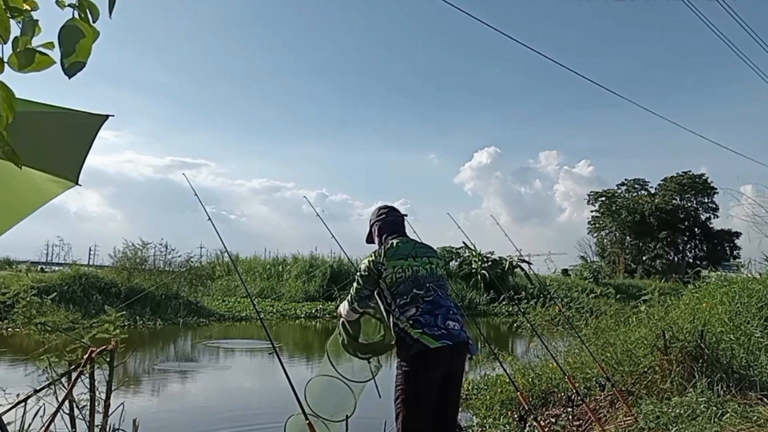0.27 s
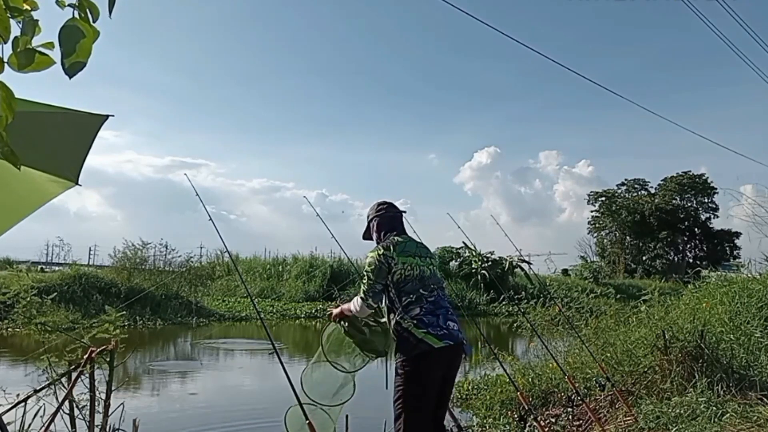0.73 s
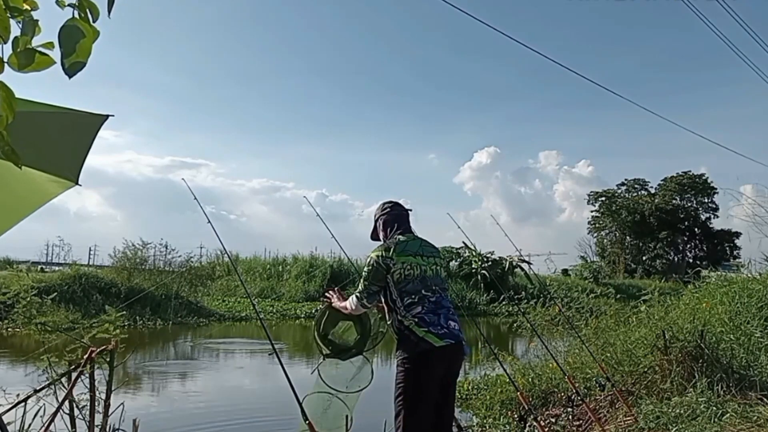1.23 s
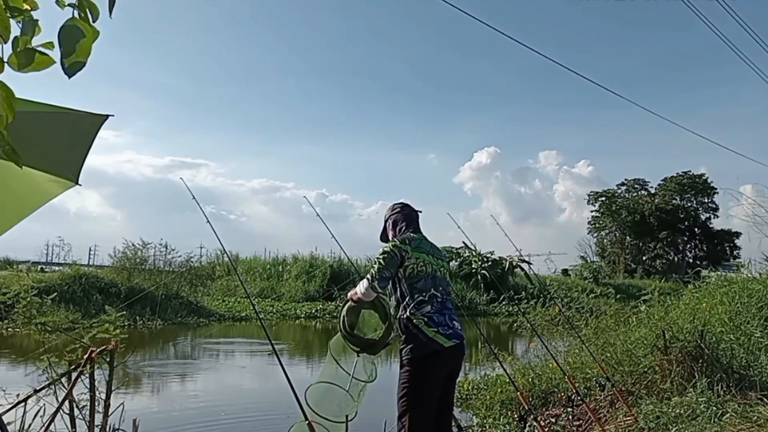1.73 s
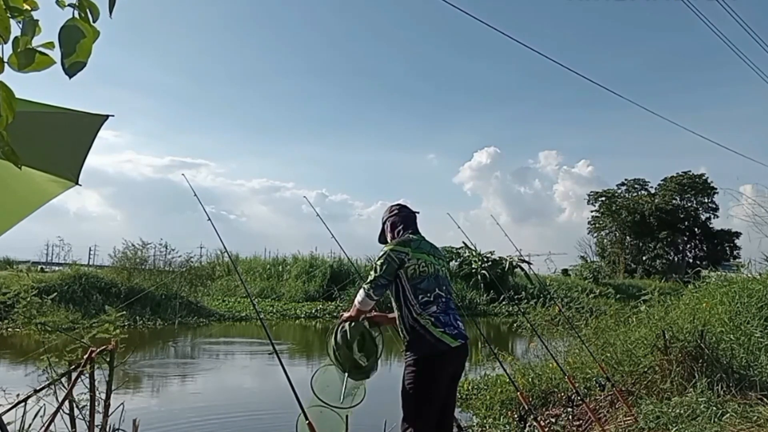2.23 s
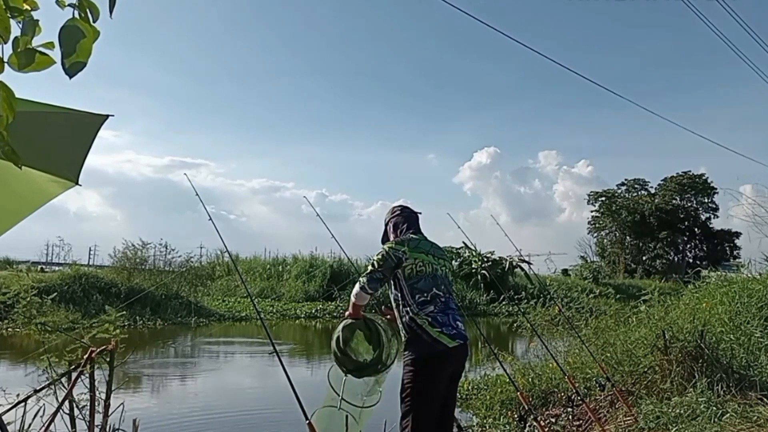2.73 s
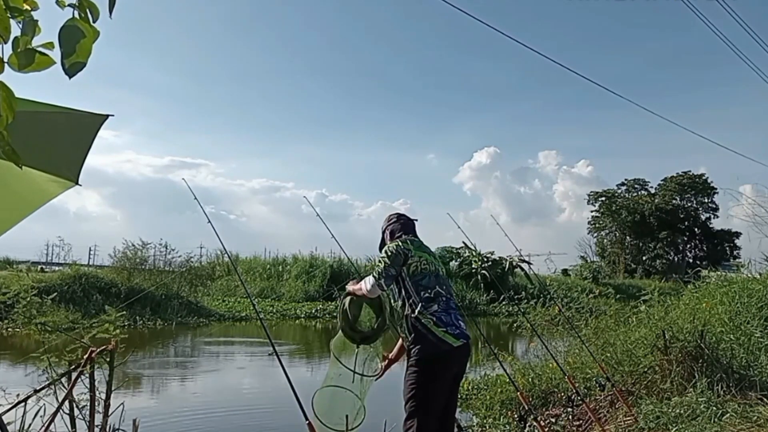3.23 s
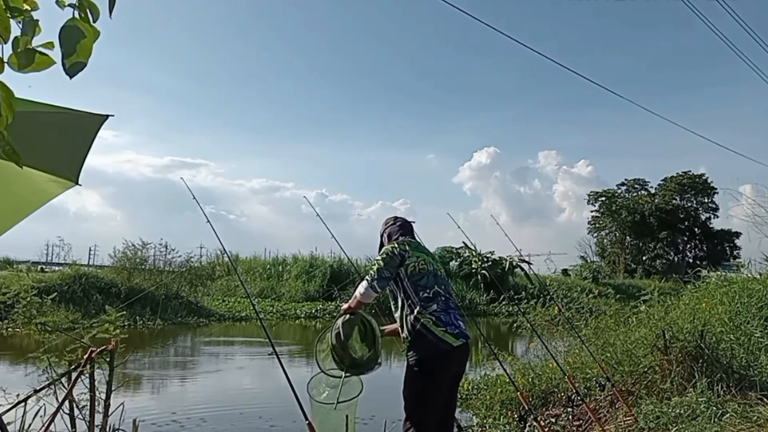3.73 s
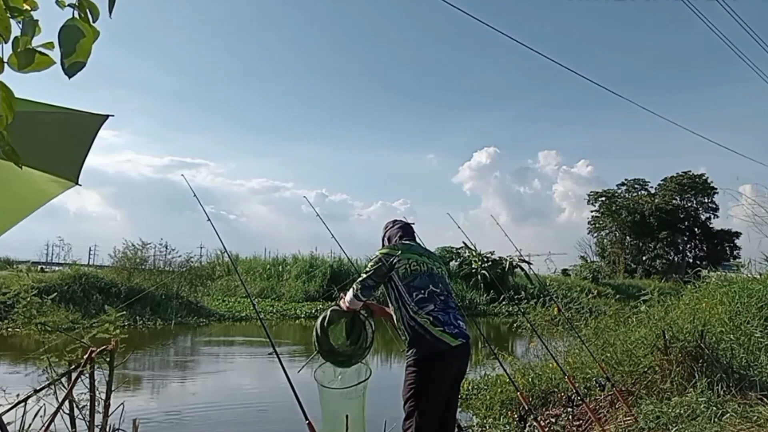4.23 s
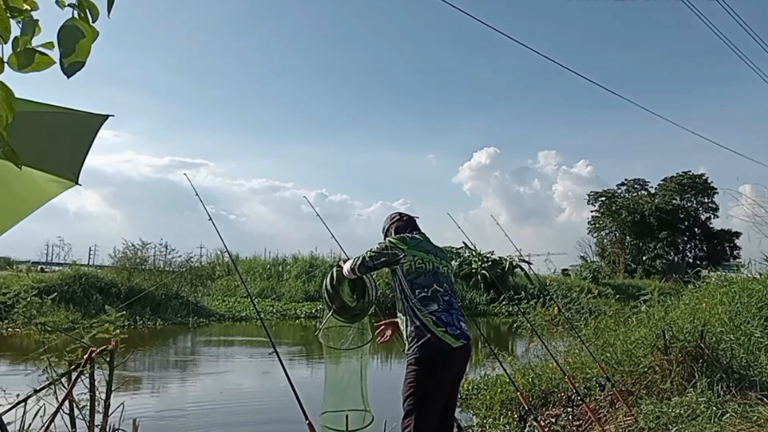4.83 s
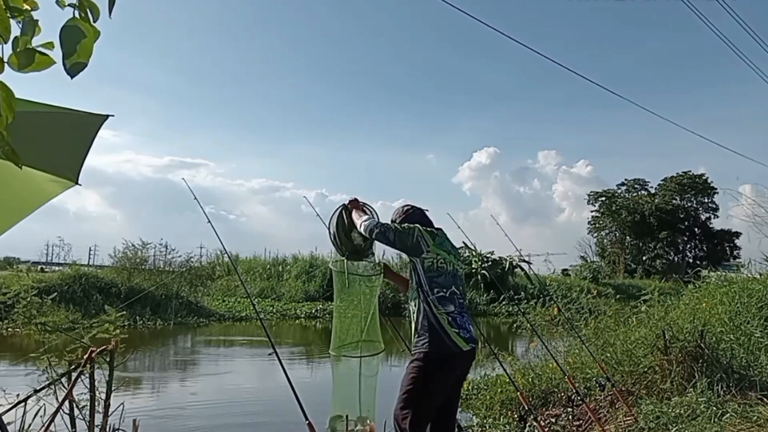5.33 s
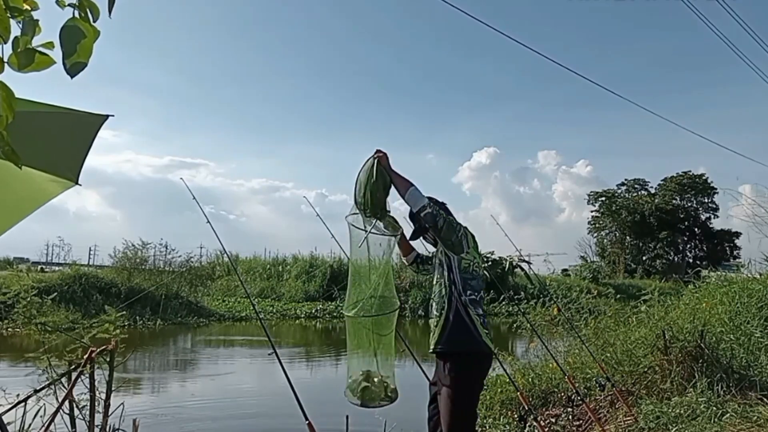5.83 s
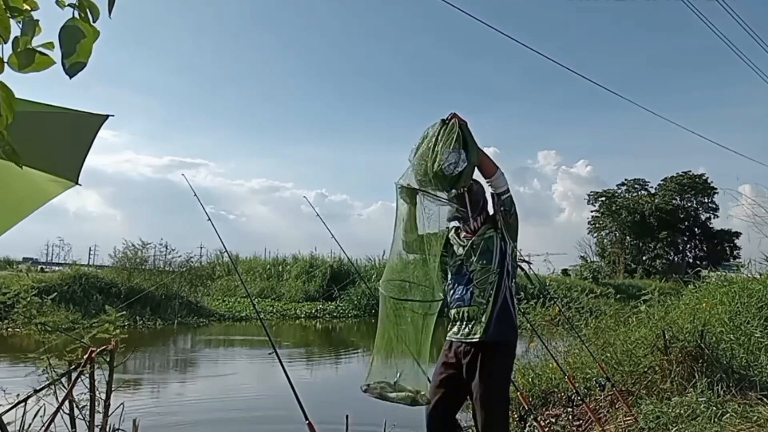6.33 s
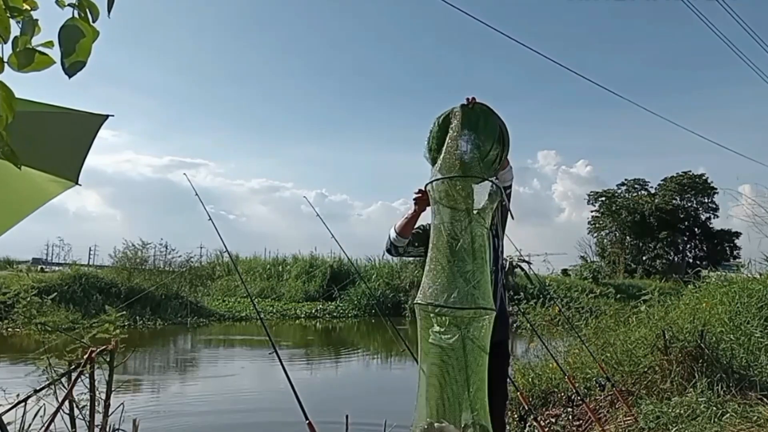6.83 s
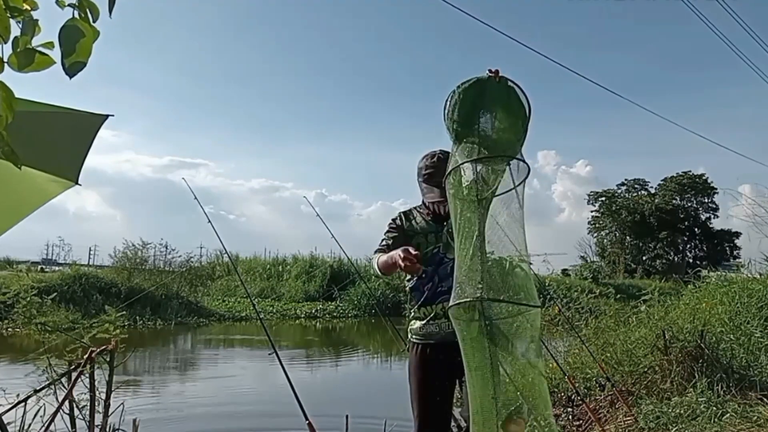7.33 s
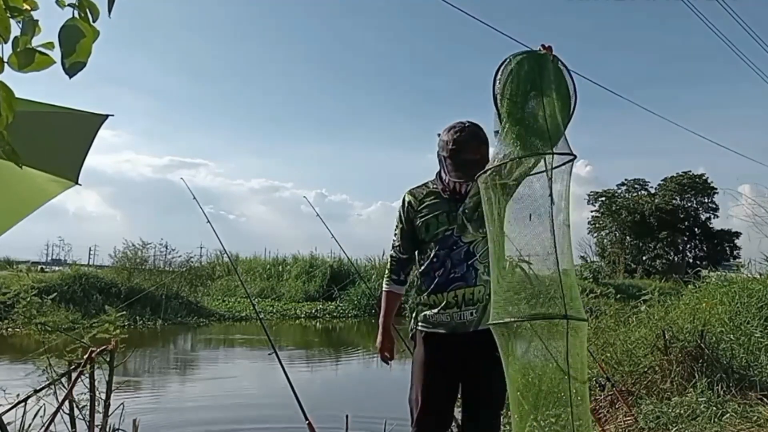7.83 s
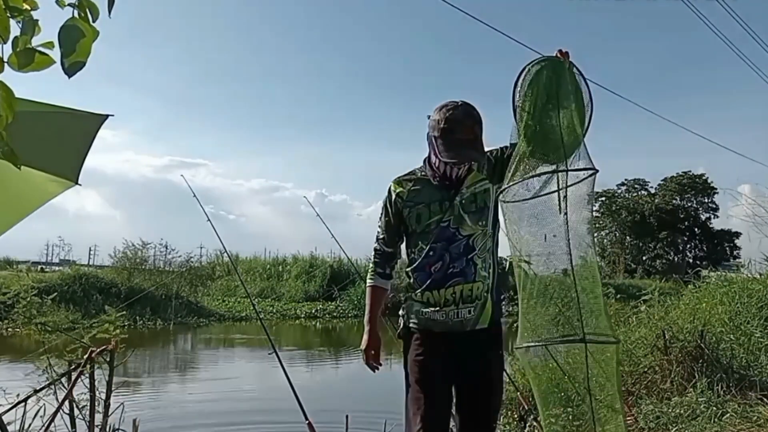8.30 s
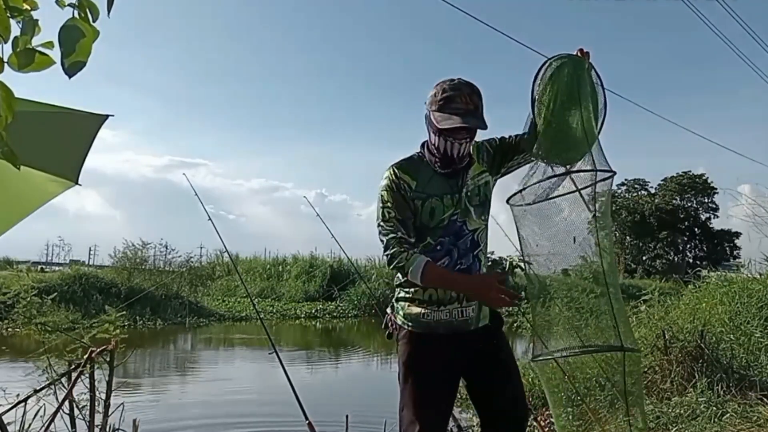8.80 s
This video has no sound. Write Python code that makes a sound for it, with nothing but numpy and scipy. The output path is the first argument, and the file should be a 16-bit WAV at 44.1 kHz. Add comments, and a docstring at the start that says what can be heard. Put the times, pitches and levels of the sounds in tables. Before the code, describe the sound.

A wet mesh net is hauled out of a canal in several pulls, each shedding a splashy, gurgling rush of water. Its hoops knock sharply during the fullest pour. Once the net is clear, the water thins to drips, spatters and small wet slaps, with a couple more light knocks. Small birds chirp and warble farther off, over a low rumble of distant traffic and open-air hiss.

```python
"""Canal bank: a wet mesh keepnet is hauled out of the water.
Each pull sheds a rush that sprays (noisy drop impacts) and gurgles (ringing bubbles); the mesh slaps
and drips, the hoops knock lightly. Small birds whistle in the bushes, with one thin, faint, very high
ping, over the low rumble of distant traffic and open-air hiss."""
import sys
import numpy as np
from scipy import signal
from scipy.fft import rfft, irfft
from scipy.io import wavfile
from scipy.ndimage import uniform_filter1d

SR = 44100
rng = np.random.default_rng(int(sys.argv[2]) if len(sys.argv) > 2 else 0)


def to_wav(sig):
    """Store sig (one row per channel, or 1-D mono) as 16-bit WAV at the path in sys.argv[1].

    Samples outside -1..1 are clipped; the rate is SR.
    """
    pcm = np.clip(np.atleast_2d(sig), -1, 1) * 32767
    pcm = np.round(pcm).astype(np.int16)
    wavfile.write(sys.argv[1], SR, pcm.T)  # frames by channels


N = 399546

# Table levels are relative, ahead of each layer's gain.
# water shed per pull (start [s], length [s], spray level [dB], churn level [dB])
PULLS = [(0.353, 0.25, -90, -59), (0.7, 0.24, -55, -50), (1.239, 0.2, -66, -49.5),
         (1.456, 0.3, -60.5, -50.5), (1.987, 0.029, -58.5, -70), (2.208, 0.087, -56, -44.5),
         (2.27, 0.13, -52, -39.5), (2.413, 0.098, -51.5, -54), (2.507, 0.24, -54, -46),
         (2.753, 0.43, -53.5, -44.5), (3.96, 0.11, -53, -69), (4.282, 0.024, -55.5, -60),
         (4.69, 0.014, -49, -47.5), (5.584, 0.24, -66, -66), (6.73, 0.041, -59, -59.5),
         (6.959, 0.047, -55.5, -57), (7.087, 0.17, -65, -58), (7.446, 0.098, -62.5, -60),
         (8.468, 0.045, -61.5, -71), (8.792, 0.059, -54, -56)]
# wet mesh slaps (time [s], level [dB], t60 [s], body weight [dB])
MESH_SPLASHES = [(0.2376, -48, 0.12, -28), (0.345, -67.5, 0.18, 18), (0.421, -62, 0.1, 15.5),
                 (0.484, -63.5, 0.13, 15.5), (0.679, -62, 0.19, 14), (0.7336, -46, 0.15, 4),
                 (0.833, -42, 0.033, -24), (1.2356, -41.5, 0.13, 2.5), (1.279, -42, 0.45, -4),
                 (1.485, -42, 0.28, -10), (1.605, -45.5, 0.19, -15), (2.5314, -25, 0.042, -26),
                 (2.896, -39, 0.12, 0.5), (2.949, -40.5, 0.2, -11), (3.6755, -48, 0.071, -12),
                 (4.5435, -50, 0.26, -6.5), (4.7311, -28.5, 0.068, -29), (5.111, -39.5, 0.025, -13),
                 (5.615, -44, 0.081, -8), (5.652, -40, 0.17, -11), (5.733, -34, 0.043, -33),
                 (6.58, -56.5, 0.093, 8), (6.7, -60.5, 0.056, 14), (6.909, -48.5, 0.22, -31),
                 (6.992, -36, 0.082, -11), (7.1063, -36.5, 0.093, -33), (7.141, -45, 0.31, -2.5),
                 (7.3152, -42, 0.18, -19), (7.432, -61, 0.11, 16.5), (7.911, -48.5, 0.038, 1),
                 (8.051, -58, 0.23, 3.5), (8.2219, -46, 0.061, -9), (8.3612, -35.5, 0.061, -35),
                 (8.509, -50, 0.24, -1.5), (8.607, -52, 0.061, 8), (8.8, -42, 0.046, 0),
                 (8.8265, -25.5, 0.07, -31), (8.8525, -30.5, 0.14, -29)]
# run-off between rushes (time [s], level [dB])
RUNOFF = [(0, -67.5), (.6, -64.5), (1.2, -60), (1.9, -71), (3.4, -72), (4.2, -71), (5.2, -66), (5.5, -75),
          (5.8, -67.5), (6.25, -82), (7.3, -71.5), (8.1, -73.5), (9.05, -74)]
# single drops on mesh and grass (time [s], level [dB])
DROP_TICKS = [(4.04, -43), (4.1958, -46), (5.6989, -47), (5.8222, -45), (5.8853, -47), (6.765, -40.5),
              (6.8907, -47), (6.9144, -44.5), (7.677, -59), (7.787, -52), (7.8336, -57), (7.9742, -40.5),
              (7.9848, -46), (8.199, -48), (8.4033, -58), (8.732, -45.5)]
# drop impact spectrum (frequency [Hz], level [dB])
SPRAY_SPECTRUM = [(600, -11), (1100, -9.5), (1750, -9), (2300, -13), (3600, -0.5), (4700, -6.5),
                  (5400, -13), (7200, -13), (8700, -5.5), (10300, -15.5), (12300, -20), (15600, -19)]
# favoured bubble sizes (centre [Hz], half-width [Hz], level [dB])
BUBBLE_BANDS = [(507.6, 83, -6.5), (860.6, 211, -6.5), (1314, 230, -10)]
# large bubbles (time [s], level [dB], nominal pitch [Hz])
LARGE_BUBBLES = [(0.392, -45, 800), (0.424, -41, 1410), (0.73, -39.5, 840), (0.819, -34, 570),
                 (0.872, -36, 460), (1.033, -42, 522), (1.28, -34, 1290), (1.312, -32, 521),
                 (1.336, -30, 1034), (1.361, -34.5, 900), (1.409, -32.5, 810), (1.486, -35, 520),
                 (1.56, -33, 870), (1.498, -35, 760), (1.655, -43, 485), (1.724, -36.5, 495),
                 (2.238, -36.5, 780), (2.335, -32.5, 492), (2.362, -39, 294), (2.388, -36, 452),
                 (2.581, -31, 492), (2.662, -38.5, 167), (2.778, -38.5, 497), (2.813, -35.5, 593),
                 (2.896, -39, 474), (2.955, -37, 507), (2.991, -29.5, 522), (3.14, -37, 610),
                 (4.03, -48, 506), (4.31, -47.5, 530), (4.544, -45, 500), (6.648, -46, 630),
                 (5.302, -45.5, 1590), (6.976, -44, 1160), (7.483, -40.5, 1360), (8.826, -32, 1420),
                 (8.945, -42.5, 1240)]
# hoop knocks (time [s], level [dB], ring [Hz])
HOOP_KNOCKS = [(2.532, -7.5, 3520), (2.581, -13.5, 4340), (2.7114, -21.5, 3670), (6.647, -23, 3740),
               (8.3595, -19.5, 2270)]
# single bird notes, plus one thin, faint, very high ping
# (time [s], length [s], first [Hz], middle [Hz], last [Hz], level [dB])
NOTES_AND_PING = [(0.005, 0.19, 1180, 1104, 990, -74.5), (0.123, 0.029, 3510, 3580, 3570, -58.5),
                  (0.325, 0.1, 3650, 3950, 4590, -59.5), (0.564, 0.089, 3420, 3870, 3810, -60),
                  (1.1, 0.076, 2660, 2620, 2500, -64), (1.855, 0.16, 1150, 1112, 970, -69.5),
                  (3.657, 0.18, 3420, 4410, 4430, -64), (4.362, 0.035, 3840, 3730, 3500, -56.5),
                  (4.468, 0.092, 2630, 2654, 2590, -61.5), (4.603, 0.13, 3650, 3380, 3360, -62.5),
                  (4.791, 0.13, 3150, 2860, 2650, -63), (4.923, 0.065, 3050, 3450, 3680, -61),
                  (5.086, 0.055, 3280, 3045, 2550, -57.5), (5.18, 0.096, 2700, 2646, 2810, -58),
                  (5.286, 0.11, 3730, 3750, 3630, -62.5), (6.065, 0.12, 4300, 4390, 4380, -67.5),
                  (6.48, 0.085, 5500, 5240, 5130, -73), (8.257, 0.029, 11950, 11950, 11900, -77),
                  (8.33, 0.09, 2200, 3500, 1880, -65.5)]
# warbler phrase (offset [s], length [s], first [Hz], middle [Hz], last [Hz], level [dB])
WARBLE = [(0, 0.046, 4700, 4930, 5860, -60.5), (0.136, 0.018, 5340, 4560, 3920, -56),
          (0.195, 0.024, 4280, 4380, 4570, -57), (0.221, 0.0236, 4090, 4050, 3400, -52.5),
          (0.27, 0.021, 4620, 4670, 4300, -54.5), (0.298, 0.019, 4220, 3880, 3520, -51.5),
          (0.335, 0.039, 3220, 4185, 4270, -47.5), (0.436, 0.06, 4400, 4670, 5320, -63.5),
          (0.51, 0.017, 5050, 4520, 3900, -50.5), (0.555, 0.028, 4270, 3860, 3300, -52),
          (0.616, 0.037, 4550, 4400, 3500, -49.5), (0.678, 0.029, 4180, 3660, 2770, -54.5),
          (0.71, 0.069, 3500, 3550, 2380, -58)]
# phrase entries (time [s], gain [dB])
WARBLE_STARTS = [(3.873, -4.5), (7.536, -3)]
# another bird's short pips (time [s], pitch [Hz], level [dB])
BIRD_PIPS = [(4.902, 2870, -53.5), (4.938, 2940, -54.5), (4.973, 2840, -56), (5.11, 2833, -55),
             (5.151, 2900, -54), (5.358, 2970, -56), (5.399, 2927, -53.5), (5.437, 2766, -54),
             (5.564, 2870, -53), (5.608, 2844, -52)]
# nearer bird's repeated falling note (time [s], held [Hz], last [Hz], level [dB])
NEAR_TRILL = [(5.778, 4010, 3570, -57.5), (5.917, 4000, 3520, -55.5), (6.035, 3950, 3430, -55),
              (6.159, 3940, 3020, -55), (6.286, 3950, 3130, -52), (6.411, 4100, 3550, -54.5),
              (6.54, 3970, 3250, -56), (6.676, 3860, 2890, -57)]
# traffic rumble and hiss (frequency [Hz], level [dB])
AIR_SPECTRUM = [(30, -24), (42, -12.5), (54, 2.5), (105, 1), (160, -8), (220, -13), (420, -24.5),
                (1100, -29), (1800, -34.5), (3900, -35), (5300, -49), (7200, -46.5), (8600, -41),
                (11500, -73), (15600, -49)]

LIFTED_S = 3.9  # net clear of the water, dripping
NEAR_S, NEAR_TREBLE_DB = 5.8, 2  # net held close: brighter drops
RISE_S, SAG_DB, SPRAY_DRAIN_DB_PER_S, CHURN_DRAIN_DB_PER_S = 0.023, -3, 133, 229
AIR_DB, CUTOFF_HZ = -49, 15650


def spray():
    """Fine drops land in clumps, many ringing; splashes crack, then crackle; single drops tick."""
    t = np.arange(N) / SR
    fine = patter(per_s=600, spread_db=-1, ring_s=.0045) + .61 * rng.standard_normal(N)
    crackle = patter(per_s=450, spread_db=3.5, ring_s=.0022) + .65 * rng.standard_normal(N)
    splash_env, body_env, crack_env, tick_env = impact_envelopes()
    trickle = gain_of(np.interp(t, *np.transpose(RUNOFF)) + 2.5 * drift(per_s=18) - 2.5)  # spurts
    flow = np.hypot(trickle, rushes(column=2, drain_db_per_s=SPRAY_DRAIN_DB_PER_S))
    flow *= gain_of(5 + 2.05 * drift(per_s=41))
    slap = unit_rms(band(patter(per_s=900, spread_db=6.5, ring_s=.0078), 810, 2830))
    stray = coloured(patter(per_s=40, spread_db=3.5, ring_s=.0016), SPRAY_SPECTRUM[4:])
    crack = coloured(rng.standard_normal(N), SPRAY_SPECTRUM)
    ringing = sum(bubble_train(bubble(hz, cycles=8, rise=.07), per_s=60, spread_db=2.5)
                  for hz in np.geomspace(1900, 5500, 8))
    out = gain_of(-2) * coloured(fine, SPRAY_SPECTRUM) * flow
    out += gain_of(-4) * coloured(crackle, SPRAY_SPECTRUM) * splash_env
    out += gain_of(-8.5) * unit_rms(ringing) * np.hypot(flow, .5 * splash_env)
    out += crack * crack_env + unit_rms(band(crack, 3500, 22000)) * tick_env
    out += gain_of(-71) * stray * (t > LIFTED_S)
    treble = band(out, 5000, 20000) * (t > NEAR_S)
    return out + (gain_of(NEAR_TREBLE_DB) - 1) * treble + slap * body_env


def impact_envelopes():
    """Exponential decays: splash, its lower body, its opening crack, drop tick."""
    splash, body, crack, tick = np.zeros((4, N))
    t = np.arange(SR // 4) / SR
    for s, db, t60_s, body_db in MESH_SPLASHES:
        burst = gain_of(db - 60 * t / t60_s) * (1 - np.exp(-t / .0015))
        add(splash, s, burst)
        add(body, s, burst * gain_of(body_db))
        add(crack, s, burst * .5 * np.exp(-t / .0082))
    for s, db in DROP_TICKS:
        add(tick, s, gain_of(db - 4.5) * np.exp(-t / .0045))
    return splash, body, crack, tick


def rushes(column, drain_db_per_s):
    """Power-summed envelope of the rushes: each swells, sags, drains away."""
    power, t = np.zeros(N), np.arange(SR) / SR
    for row in PULLS:
        s, length_s, db = row[0], row[1], row[column]
        shape_db = SAG_DB * np.minimum(t / length_s, 1) - drain_db_per_s * np.maximum(t - length_s, 0)
        add(power, s, (np.minimum(t / RISE_S, 1) * gain_of(db + shape_db)) ** 2)
    return np.sqrt(power)


def drops(per_s, spread_db):
    """Random impact train, uneven in size."""
    size = gain_of(spread_db * np.minimum(rng.exponential(1, N), 4)) * rng.choice([-1., 1.], N)
    return size * (rng.random(N) < per_s / SR)


def patter(per_s, spread_db, ring_s):
    """Noise flaring with each small impact."""
    flares = signal.lfilter([1], [1, -np.exp(-1 / (ring_s * SR))], abs(drops(per_s, spread_db)))
    return unit_rms(flares * rng.standard_normal(N))


def gurgle():
    """Bubble swarm surging with each rush, drips once lifted, single large bubbles."""
    swarm, drips = np.zeros((2, N))
    for hz, half_width_hz, db in BUBBLE_BANDS:
        for offset, z in zip(np.linspace(-1, 1, 8), rng.standard_normal(8)):
            ring = bubble(hz + half_width_hz * offset, cycles=5 * np.exp(.25 * z), rise=.05)
            swarm += gain_of(db) * bubble_train(ring, per_s=36, spread_db=2.8)
    for hz in np.geomspace(950, 2700, 8):
        drips += bubble_train(bubble(hz, cycles=2.5, rise=.08), per_s=5, spread_db=2.5)
    wash = band(rng.standard_normal(N), 145, 2300)
    surges = rushes(column=3, drain_db_per_s=CHURN_DRAIN_DB_PER_S) * gain_of(-1 + 2 * drift(per_s=48))
    out = surges * unit_rms(unit_rms(swarm) + .34 * unit_rms(wash))
    out += gain_of(-72.5) * unit_rms(drips) * (np.arange(N) > LIFTED_S * SR)
    for s, db, hz in LARGE_BUBBLES:
        decay_jitter, rise_jitter = rng.uniform(-1.2, 1, 2)
        ring = bubble(.992 * hz, cycles=5.13 * np.exp(.17 * decay_jitter), rise=.01 * (1 + rise_jitter))
        add(out, s, gain_of(db + 5.5) * ring)
    return out


def bubble(hz, cycles, rise):
    """Damped sine; pitch climbs as the bubble nears the surface."""
    u = np.arange(int(4 * cycles * SR / hz)) / SR * hz / cycles
    return (1 - np.exp(-9 * u)) ** 2 * np.exp(-1.6 * u) * np.sin(2 * np.pi * cycles * (u + rise * u ** 2))


def bubble_train(ring, per_s, spread_db):
    """One bubble ring per random impact."""
    return signal.oaconvolve(drops(per_s, spread_db), ring)[:N]


def hoop_knocks():
    """Brief ring, its reflection off the water, a scattered tail."""
    out, t = np.zeros(N), np.arange(SR // 8) / SR
    for s, db, hz in HOOP_KNOCKS:
        ring = (1 - np.exp(-t / .00031)) * np.exp(-t / .00039) * np.sin(2 * np.pi * hz * t)
        ring = band(ring, .65 * hz, 2 * hz)  # thin hoop: no low body
        tail = unit_rms(band(rng.standard_normal(len(t)), .63 * hz, 1.29 * hz)) * np.exp(-t / .0082)
        add(out, s + .000693, gain_of(db + 3.5) * ring)
        add(out, s + .0029, gain_of(db - 3.5) * ring)
        add(out, s, gain_of(db - 20) * tail)
    return out


def birds_and_ping():
    """Single bird notes, a warbler's phrase sung twice, pips, a nearer trill; one faint high ping."""
    out = np.zeros(N)
    for s, *row in NOTES_AND_PING:
        add(out, s, note(*row))
    for start_s, gain_db in WARBLE_STARTS:
        for offset_s, *glide, db in WARBLE:
            add(out, start_s + offset_s, note(*glide, db + gain_db))
    for s, hz, db in BIRD_PIPS:
        add(out, s, note(.0202, .94 * hz, hz, .99 * hz, db))
    for s, held_hz, last_hz, db in NEAR_TRILL:  # hold, downward hook, opening tick
        add(out, s, note(.036, held_hz, .98 * held_hz, .95 * held_hz, db - 4, [-12, -27]))
        add(out, s + .022, note(.026, held_hz, .5 * (3600 + last_hz), last_hz, db - 2.5, [-23]))
        add(out, s - .004, note(.0067, 5600, 4470, held_hz, db - 8))
    return out


def note(length_s, first_hz, middle_hz, last_hz, db, overtones_db=()):
    """Gliding tone; trembles in pitch and level, swells towards its end."""
    u = np.arange(int(length_s * SR)) / (length_s * SR)
    pitch_shake, level_shake = uniform_filter1d(rng.standard_normal((2, SR // 4)), 130)[:, :len(u)]
    glide_hz = np.interp(u, [0, .5, 1], [first_hz, middle_hz, last_hz])
    glide_hz = uniform_filter1d(glide_hz, len(u) // 5 + 1, mode="nearest")
    turns = np.cumsum(glide_hz + 650 * pitch_shake) / SR
    tone = sum(gain_of(d) * np.sin(2 * np.pi * k * turns) for k, d in enumerate([0, *overtones_db], 1))
    envelope = gain_of(db + 33.6 * level_shake + 6.4 * u) * signal.windows.tukey(len(u), .45)
    return np.sqrt(2) * envelope * tone


def traffic_and_air():
    """Distant rumble and hiss; a faint engine drone wavers inside."""
    noise = coloured(rng.standard_normal(N), AIR_SPECTRUM) * gain_of(.8 * drift(per_s=3))
    flutter = (gain_of(1.5 * drift(per_s=11)) - 1) * band(noise, 48, 390)
    drone_hz = 107 + 7 * drift(per_s=9.07)
    drone = np.sin(2 * np.pi * np.cumsum(drone_hz) / SR) * gain_of(-8.5 + 3.5 * drift(per_s=5.5))
    return gain_of(AIR_DB) * (noise + flutter + drone)


def bank_echoes(x, wet_db):
    """x plus echoes off bushes and far bank: quick cluster, faint long tail."""
    t = np.arange(SR // 3) / SR
    echoes = rng.choice([-1., 1.], len(t)) * (rng.random(len(t)) < .25) * (t > .004)
    echoes *= gain_of(-60 * t / .11) + .3 * gain_of(-60 * t / .7)
    return x + gain_of(wet_db) * signal.oaconvolve(x, echoes / np.linalg.norm(echoes))[:N]


def gain_of(db):
    """dB to amplitude."""
    return 10 ** (np.asarray(db) / 20)


def unit_rms(x):
    """Scale to rms 1."""
    return x / np.sqrt(np.mean(x ** 2) + 1e-20)


def add(mix, s, sound):
    """Mix in at time s."""
    part = mix[round(s * SR):][:len(sound)]
    part += sound[:len(part)]


def coloured(x, points):
    """Filter by (frequency [Hz], level [dB]) points; unit rms."""
    points_hz, db = np.transpose(points)
    hz = np.fft.rfftfreq(len(x), 1 / SR)
    response = gain_of(np.interp(np.log(hz + 1), np.log(points_hz + 1), db))
    return unit_rms(irfft(rfft(x) * response, len(x)))


def band(x, lo_hz, hi_hz):
    """Band-pass."""
    return signal.sosfilt(signal.butter(2, [lo_hz, hi_hz], "bandpass", fs=SR, output="sos"), x)


def drift(per_s):
    """Slow random wander, unit rms."""
    size = int(SR / per_s)
    return unit_rms(uniform_filter1d(uniform_filter1d(rng.standard_normal(N), size), size))


def scene():
    """Mono mix; birds are far, so more echoed than the water."""
    mix = traffic_and_air() + spray()
    mix += bank_echoes(gurgle() + hoop_knocks(), wet_db=-9)
    mix += bank_echoes(birds_and_ping(), wet_db=-3.5)
    return mix[None]


def record(dry):
    """Steep low-pass."""
    return signal.oaconvolve(dry, signal.firwin(511, CUTOFF_HZ, window=("kaiser", 9), fs=SR)[None], "same")


dry = scene()
out = record(dry)
to_wav(out)
```